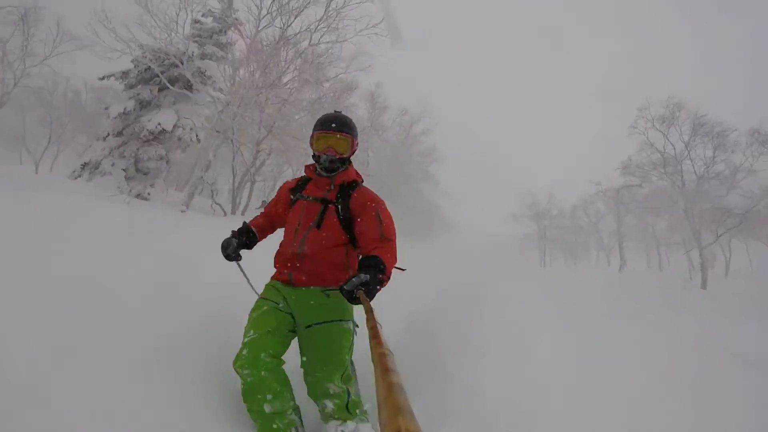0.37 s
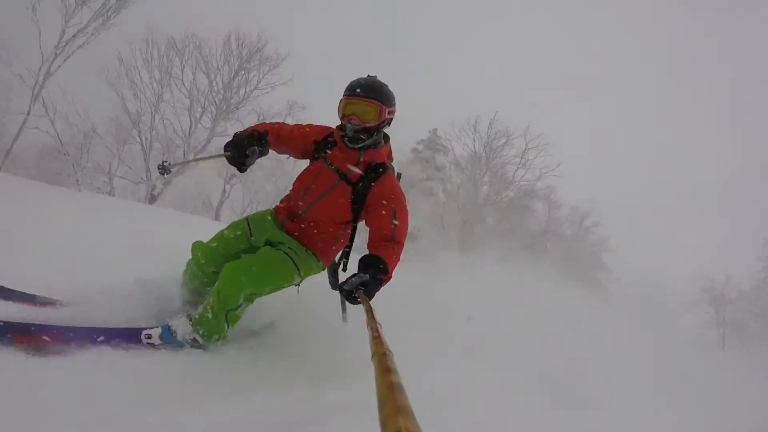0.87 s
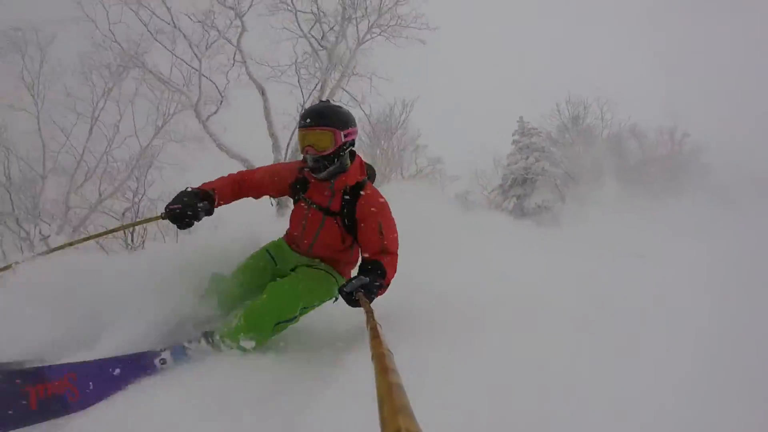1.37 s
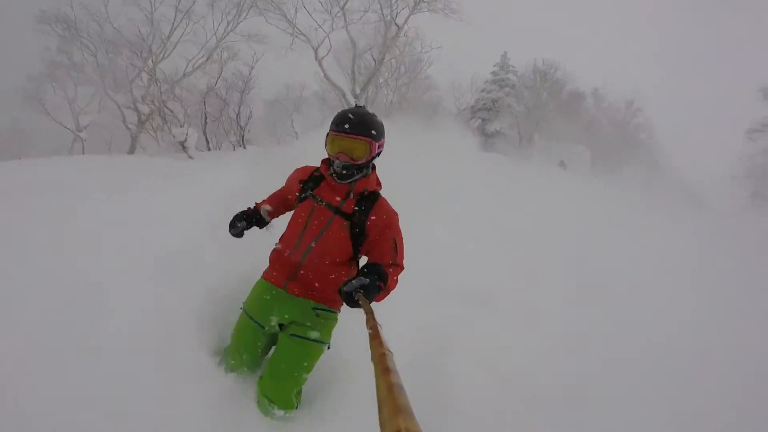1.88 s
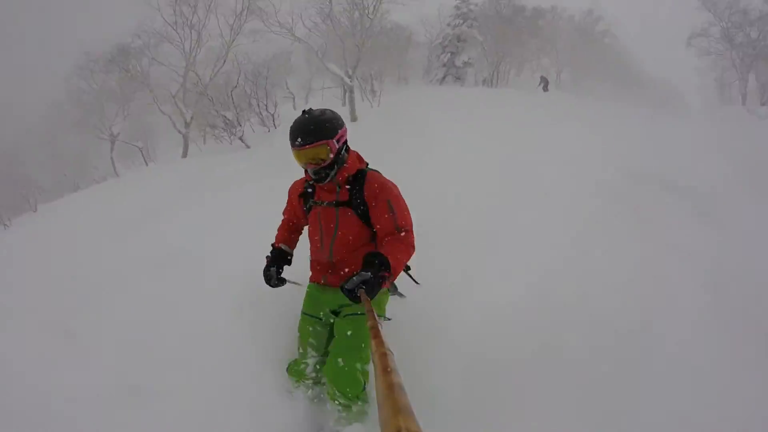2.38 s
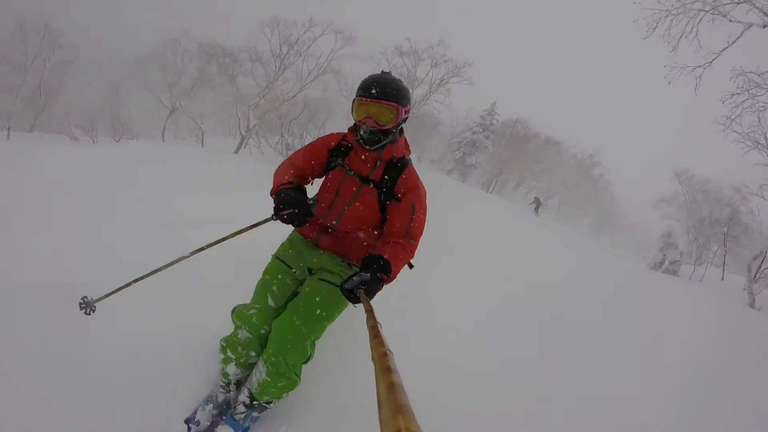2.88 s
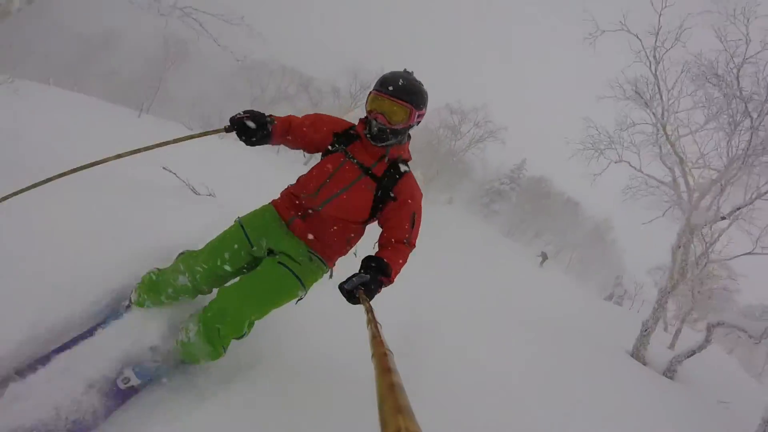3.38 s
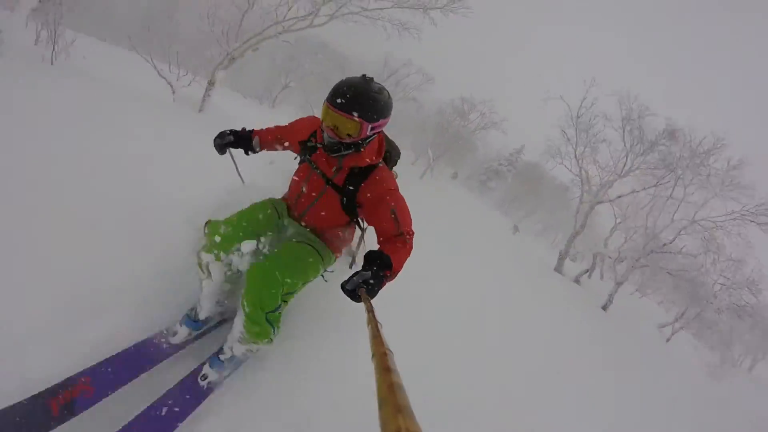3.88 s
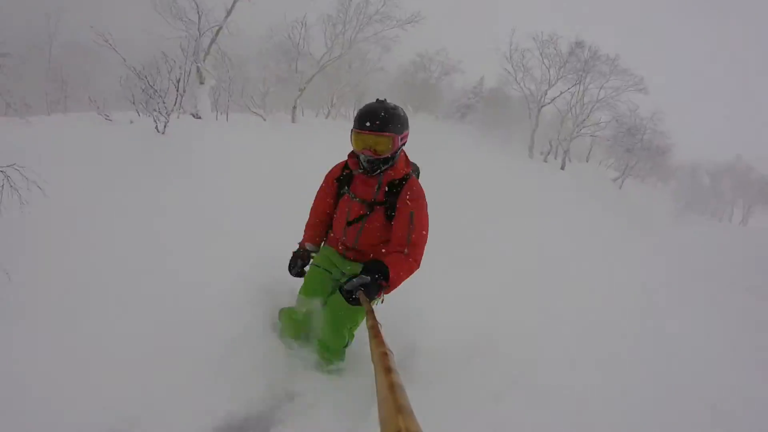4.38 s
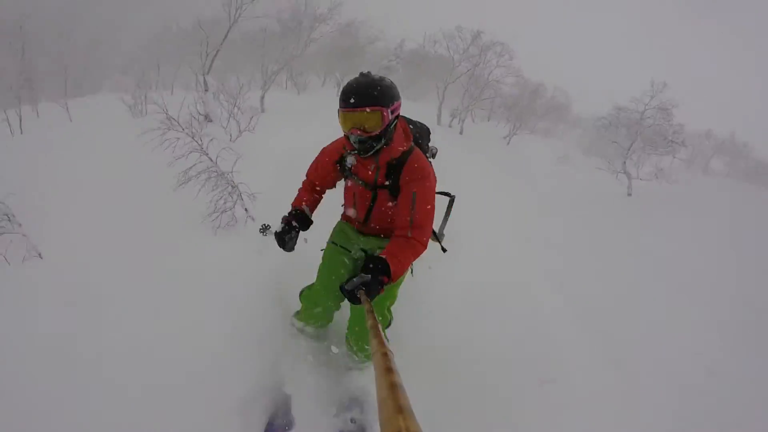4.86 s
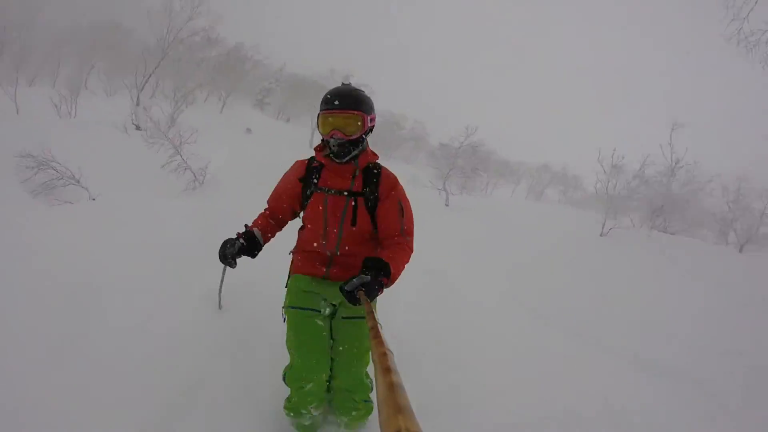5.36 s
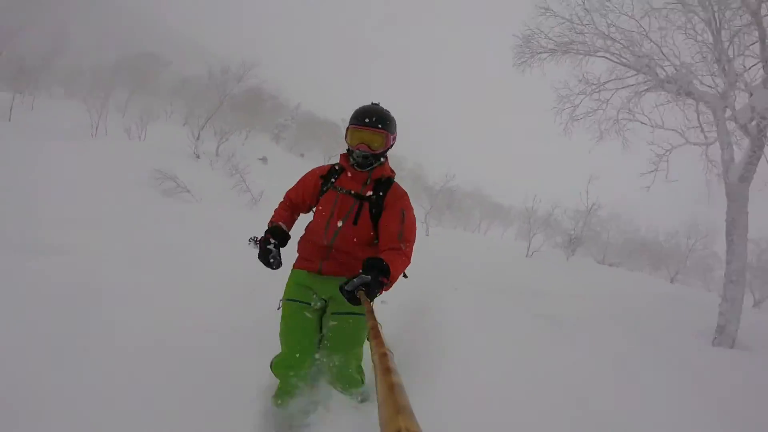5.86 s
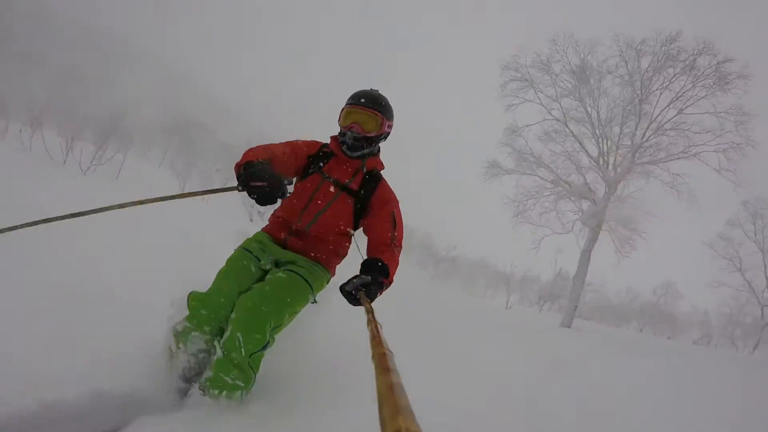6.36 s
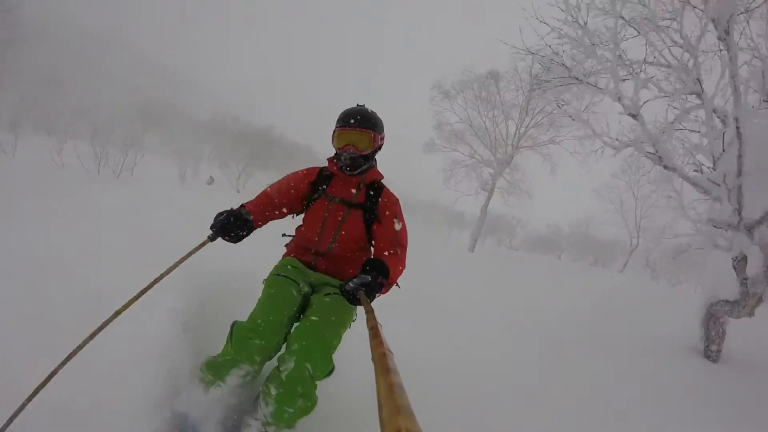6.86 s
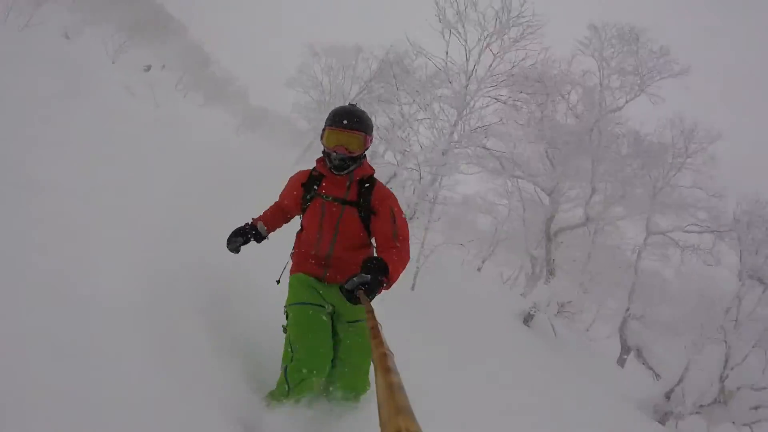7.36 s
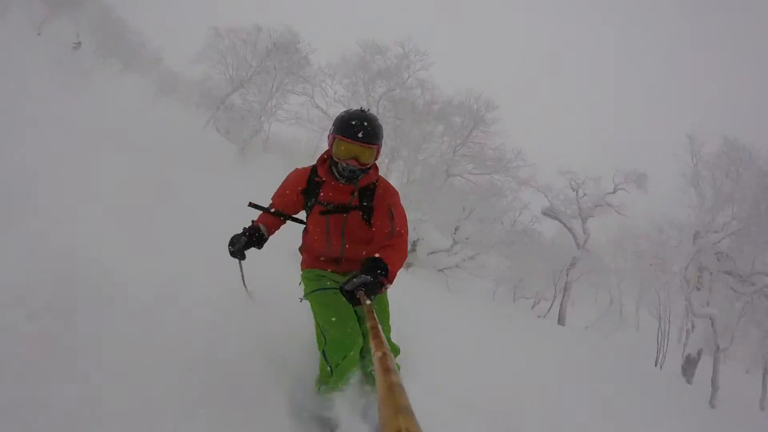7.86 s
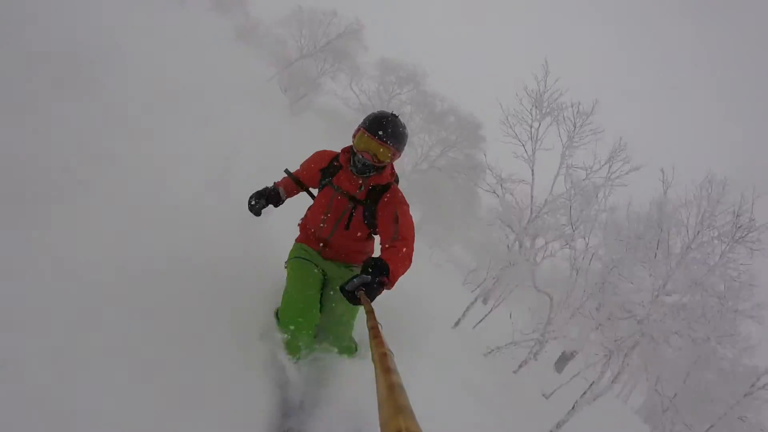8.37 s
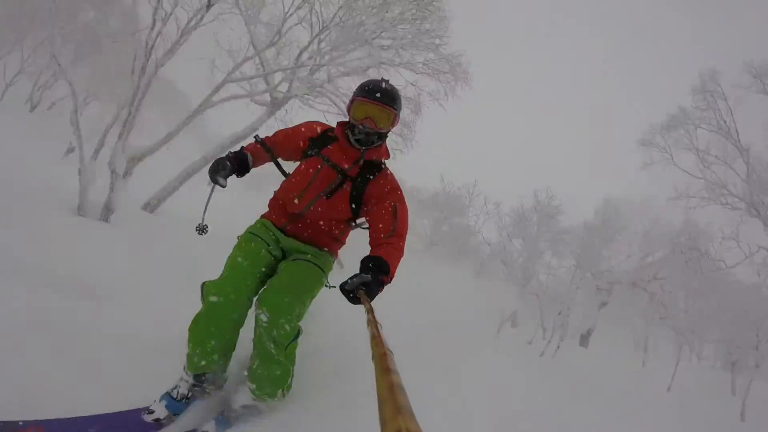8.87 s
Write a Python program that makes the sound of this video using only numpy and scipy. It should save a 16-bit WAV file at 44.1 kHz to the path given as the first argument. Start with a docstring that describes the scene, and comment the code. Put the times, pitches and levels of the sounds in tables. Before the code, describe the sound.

A small plastic-cased camera rides on a pole down a snowy slope. Snow grains patter on the shell as sharp dry ticks over a fine, thin hiss of powder and skis. Deep wind lumps and a wavering low moan swell in the first two seconds and again just after four, then ease; the ticking grows denser and harder toward the end.

```python
"""A ski slope in falling snow: a small camera in a plastic housing rides down it on a pole.
Shaped noise makes the wind that buffets the housing; a wobbling band of noise moans around the pole.
Snow grains tick on the plastic, each a push and a few dying modes; a few low thuds are pushes too.
Behind them, flickering treble noise is the fine hiss of powder and of the skis."""
import sys
import numpy as np
from scipy import signal
from scipy.io import wavfile
from scipy.ndimage import uniform_filter1d

SR = 44100
rng = np.random.default_rng(int(sys.argv[2]) if len(sys.argv) > 2 else 0)


def int16_out(signal):
    """Quantize to a 16-bit WAV file."""
    q = np.round(np.clip(np.atleast_2d(signal).T, -1, 1) * 32767)
    wavfile.write(sys.argv[1], SR, q.astype(np.int16))


def convert_level_to_amplitude(level_db):
    """Map a level in decibels to its linear amplitude factor."""
    exponent = np.asarray(level_db, float) / 20
    return 10 ** exponent


N = 396459  # samples

# Share of the upper shell mode, by chance of the spot struck; ticks() limits it
UPPER_DB, UPPER_SPREAD_DB = -8, 12


def buffeting(t):
    """Slow pressure lumps of eddies that roll over the housing, and the roar of the smaller ones."""
    # Course of the wind at the housing: t/s, buffeting level/dB, roar level/dB
    wind = [(0.0, -32, -51.5), (0.8, -31, -46), (1.52, -19.5, -46.5), (2.45, -32.5, -50), (3.9, -30, -51.5),
            (3.98, -27.5, -38), (4.06, -21, -49), (4.33, -17.5, -38), (4.46, -14.5, -45.5),
            (4.78, -30, -49.5), (6.28, -34.5, -49), (6.91, -27.5, -46), (7.36, -40, -47), (7.8, -25, -46),
            (8.3, -28, -40), (8.56, -28.5, -35), (8.84, -23, -46.5), (8.99, -35, -41)]
    # Spectrum of the slow lumps, before levelling: f/Hz, level/dB
    lump_spectrum = [(4, 1.5), (10, 3.5), (28, -1), (50, -17), (90, -18.5), (160, -62), (400, -119)]
    # Spectrum of the roar, before levelling: f/Hz, level/dB
    roar_spectrum = [(40, -38), (70, 11), (190, -4.5), (300, -13.5), (600, -19), (1200, -20), (3000, -87)]
    level_db, roar_db = curve(wind, t)
    lumps = convert_level_to_amplitude(level_db) * noise(lump_spectrum, size=4096, patchy_db=0.4, flicker_db=0.4)
    roar = convert_level_to_amplitude(roar_db) * noise(roar_spectrum, size=1024, patchy_db=0.5, flicker_db=4.0)
    return lumps + roar


def moan(t):
    """Vortices shed unsteadily from the pole: a band of noise that rides on the air speed."""
    # Course of the moan: t/s, level/dB, centre f/Hz
    course = [(0.0, -51, 75.35), (0.57, -42.5, 75.2), (0.7, -24, 88.4), (0.8, -23.5, 91),
              (1.08, -17, 108.9), (1.22, -24.5, 99.1), (1.45, -20.5, 127.9), (1.6, -22.5, 97.2),
              (1.88, -32.5, 84.7), (2.05, -26, 76.4), (2.3, -46, 70.3), (2.6, -31.5, 64.5), (2.85, -51, 69),
              (3.0, -34.5, 65.5), (3.5, -32, 73), (3.9, -32.5, 79), (4.02, -18.5, 88), (4.2, -29.5, 80.2),
              (4.7, -52.5, 69.2), (6.3, -45, 60), (6.45, -34, 60.56), (6.6, -29.5, 69), (6.8, -46, 56),
              (7.5, -43, 60), (7.93, -28.5, 73.7), (8.1, -42.5, 69), (8.99, -40.5, 68.2)]
    level_db, hz = curve(course, t)
    width_hz, skirt_db = 21, -8  # width of each smoothing stage; skirt against core
    r = np.exp(-np.pi * width_hz / SR)
    wobble = rng.standard_normal(N) + 1j * rng.standard_normal(N)
    stages = []
    for _ in range(3):
        wobble = signal.lfilter([1 - r], [1, -r], wobble)
        stages.append(wobble / np.std(wobble))
    core, skirt = stages[2], stages[1]  # the skirt is wider and more ragged
    wobble = core + convert_level_to_amplitude(skirt_db) * skirt
    carrier = np.exp(2j * np.pi * np.cumsum(hz) / SR)
    return convert_level_to_amplitude(level_db) * evened((wobble * carrier).real)


def large_grains():
    """Single grains heavy enough to be heard one by one."""
    # Grains on the plastic: t/s, shell ring peak level/dB, bright ring level/dB against that peak
    grains = [(0.1292, -24, 1), (0.1454, -19.5, -5), (0.1945, -19, -6), (0.2073, -19, -13),
              (0.2726, -15, -3.5), (0.2775, -24, 2.5), (0.4088, -24, -4), (0.491, -18.5, -11),
              (0.6248, -20.5, -6.5), (0.651, -23.5, -3.5), (0.7192, -24.5, -14), (0.9585, -24.5, -22),
              (1.1117, -27, -4), (1.182, -26.5, -10), (1.3237, -24, -11), (1.54, -25.5, -15),
              (1.618, -26, -16), (1.66, -19.5, -5), (1.7196, -22.5, -7), (1.8033, -19, -10),
              (1.8711, -16.5, -7), (1.8921, -25, -4), (1.991, -13.5, -12), (2.1246, -20, -29),
              (2.17, -19.5, -6), (2.183, -24, -12), (2.191, -20, -11), (2.232, -21.5, -7),
              (2.2564, -15.5, -6), (2.3296, -18.5, -17), (2.3934, -21.5, -15), (2.467, -24, -6),
              (2.49, -23, -5), (2.5326, -28, -25), (2.5474, -24, -25), (2.5612, -21, -20),
              (2.575, -21, -16), (2.589, -23.5, -21), (2.6935, -23, -18), (2.7027, -15.5, -14),
              (2.7114, -25.5, -25), (2.8672, -27, -4), (2.9329, -21.5, -17), (2.977, -31, -7),
              (2.9966, -26, -9), (3.0134, -26, -7), (3.0497, -25.5, -7), (3.1108, -22, -4),
              (3.1639, -18, -3), (3.2554, -23.5, -22), (3.2842, -34, -3), (3.31, -28.5, -11),
              (3.381, -27, -9), (3.425, -38, 7), (3.509, -22, -5), (3.585, -21.5, -11), (3.7216, -24.5, -9),
              (3.7806, -32, -9), (3.8691, -27, -4), (3.991, -24, -10), (4.061, -24.5, -8.5),
              (4.1386, -16.5, -12.5), (4.1973, -28.5, -6), (4.2524, -17.5, -8), (4.263, -17.5, -2.5),
              (4.3066, -21.5, 0), (4.318, -21, 0), (4.3492, -27, -8), (4.3686, -21, -20),
              (4.481, -30.5, -12), (4.528, -15.5, -13), (4.6, -24.5, -4.5), (4.685, -27.5, 2),
              (4.7105, -27.5, -8), (4.81, -26, -3), (4.8521, -25, -7), (5.027, -27, -8), (5.0766, -28, -6),
              (5.0938, -22, -12), (5.1863, -24, -9), (5.445, -21, -7), (5.48, -19.5, -7),
              (5.5132, -21.5, -5.5), (5.5365, -16.5, -14), (5.6389, -20.5, -26), (5.693, -35.5, 5.5),
              (5.7219, -37, -2), (5.7396, -24, -8), (5.781, -24, -17), (5.793, -17, -5.5),
              (5.825, -22.5, -10), (5.8652, -21.5, -4), (6.039, -25, -5), (6.044, -23, -4),
              (6.0719, -26, -2), (6.092, -26, -5), (6.167, -15, -8.5), (6.195, -25.5, -19),
              (6.2537, -15.5, -9), (6.331, -20.5, -9), (6.4134, -20.5, -8), (6.482, -24, -9),
              (6.5708, -24, -16), (6.588, -23, -22), (6.6231, -19, -6.5), (6.7385, -21, -4),
              (6.7512, -17.5, -6), (6.8282, -23.5, -2), (6.893, -15.5, -20), (6.9471, -24, -10),
              (6.962, -21.5, -12), (7.008, -15.5, -5.5), (7.024, -19.5, -5), (7.2094, -35, -2),
              (7.2214, -22, -1), (7.243, -24, -13), (7.2587, -19.5, -16), (7.2723, -15, -14),
              (7.3236, -17, -22), (7.3851, -22, -12), (7.42, -15, -20), (7.434, -23, -16),
              (7.4604, -25.5, -10), (7.4832, -20.5, -9), (7.5057, -15.5, -3.5), (7.5478, -17, -5.5),
              (7.5653, -21.5, -14), (7.6813, -18, -11), (7.7047, -17.5, -6), (7.7329, -21.5, -2.5),
              (7.745, -12, -13), (7.756, -20, -12), (7.7677, -21.5, 0), (7.807, -24, -10),
              (7.9986, -16.5, -4.5), (8.026, -18.5, -0.5), (8.0434, -19, -19), (8.092, -14, -12),
              (8.16, -17.5, -3.5), (8.221, -18.5, -4), (8.3507, -18.5, -6), (8.378, -17.5, -5),
              (8.385, -18, -4), (8.411, -19, -3), (8.4953, -30, 6), (8.5232, -19, -12), (8.6, -39.5, 1),
              (8.6627, -20.5, 3), (8.6886, -19, 1), (8.716, -20, -4), (8.739, -17.5, -4.5),
              (8.8807, -17.5, -9), (8.9029, -15.5, -4.5), (8.9093, -10.5, -10), (8.934, -28.5, 4),
              (8.961, -27.5, 4)]
    s, peak_db, bright_db = np.transpose(grains)
    upper_db = UPPER_DB + UPPER_SPREAD_DB * rng.random(len(s))
    return ticks(np.transpose([s, peak_db, upper_db, bright_db]))


def small_grains(t, stream_db, count, top_db, spread_db, crowding):
    """Random fine grains that come thicker and harder when the stream is strong; none grows large."""
    s, size, a, b = rng.random((count, 4)).T
    arrived = np.cumsum(convert_level_to_amplitude(crowding * stream_db))
    s = np.interp(s, arrived / arrived[-1], t)
    size_db = spread_db * np.log(size ** 1.34 * 0.74 + 0.047)
    peak_db = 0.6 * np.interp(s, t, stream_db) + top_db + size_db
    upper_db = UPPER_DB + UPPER_SPREAD_DB * a
    bright_db = -11 + 13 * b
    return ticks(np.transpose([s, peak_db, upper_db, bright_db]))


def ticks(rows):
    """The blow rings the shell modes; the grain's crumbs rattle the bright ones for a moment longer."""
    # Two shell modes of the housing, nominal: f/Hz, level/dB, 60 dB decay/s
    shell_modes = [(1918, 0.5, 0.0079), (2573, -1.5, 0.0088)]
    # Bright modes of the housing, nominal: f/Hz, level/dB, 60 dB decay/s
    bright_modes = [(3634, 4, 0.0079), (4430, 13, 0.003), (5640, 6, 0.0067), (7370, -1.5, 0.0062),
                    (10850, -19, 0.0099), (13500, -27, 0.0055)]
    peak_db, upper_db, bright_db = (c[:, None] for c in np.transpose(rows)[1:])
    draws = rng.standard_normal((len(rows), 240))
    chance, crumbs = np.clip(draws[:, :40], -1.6, 1.6), draws[:, 40:]
    t = np.arange(600) / SR

    upper = np.clip(convert_level_to_amplitude(upper_db), 0.3, 0.8)
    shell = rings(shell_modes, [np.sqrt(1 - upper ** 2), upper], t, chance)
    rise_s = 0.00021 * convert_level_to_amplitude(1.8 * chance[:, [6]])  # the blow's rise time varies by chance
    shell *= 1 - np.exp(-(t / rise_s) ** 2)
    shell /= abs(shell).max(axis=1, keepdims=True)

    crumb_decay_s = 0.00055 * convert_level_to_amplitude(4.5 * chance[:, [7]])
    crumbs = crumbs * np.exp(-t[:200] / crumb_decay_s)
    # Hard grains reach the top modes, soft ones do not
    hardness_db = 4.5 * chance[:, [32]]  # per octave from 4500 Hz
    octaves = np.log2(np.transpose(bright_modes)[0] / 4500)[:, None, None]
    bright = rings(bright_modes, convert_level_to_amplitude(octaves * hardness_db), t, chance[:, 16:])
    bright = signal.fftconvolve(bright, crumbs, axes=1)[:, :len(t)]
    bright *= 1 - np.exp(-(t / 0.0001) ** 2)
    bright /= abs(bright).max(axis=1, keepdims=True)

    thud = convert_level_to_amplitude(3.0 * chance[:, [5]]) * push(t, width_s=0.00021)
    tick = thud - shell + convert_level_to_amplitude(bright_db) * bright
    return place(np.transpose(rows)[0], convert_level_to_amplitude(peak_db) * tick)


def rings(modes, shares, t, chance):
    """Dying modes; each grain strikes another spot, so pitch and decay shift a little."""
    total = 0
    for k, (share, (hz, db, t60)) in enumerate(zip(shares, modes)):
        struck_t60 = t60 * convert_level_to_amplitude(np.minimum(4.0 * chance[:, [8 + k]], 1))
        struck_hz = hz * (1 + 0.062 * chance[:, [k]])
        total = total + share * convert_level_to_amplitude(db - 60 * t / struck_t60) * np.sin(2 * np.pi * struck_hz * t)
    return total


def push(t, width_s):
    """The shell is pushed in and springs back."""
    return (t / width_s - 1.2) * np.exp(-t / width_s) * (1 - np.exp(-(2 * t / width_s) ** 2))


def low_thuds(t):
    """Low thuds on the housing, each a push of the shell; two of them lie under ringing ticks."""
    # Low thuds: t/s, level of the push/dB, contact time/s
    thuds = [(3.97, -35, 0.0012), (6.5849, -3.5, 0.00025), (7.025, -12.5, 0.00055)]
    s, db, contact_s = np.transpose(thuds)[:, :, None]
    return place(s[:, 0], convert_level_to_amplitude(db) * push(t[:1500], contact_s))


def stream(t):
    """Strength of the snow stream in dB: its slow course, broken into uneven flurries."""
    # Slow course of the snow stream, with a brief lull near the end: t/s, level/dB
    course = [(0.0, -55), (0.15, -48), (0.45, -50), (0.8, -53), (1.4, -52), (1.75, -49), (2.28, -48),
              (2.44, -56), (2.57, -46), (2.85, -54), (3.35, -51), (3.55, -55), (3.9, -52), (4.2, -55),
              (4.33, -46), (4.5, -55), (5.3, -53.5), (5.45, -50.5), (5.62, -50), (5.68, -61), (5.9, -55),
              (6.1, -51), (7.05, -48), (7.25, -45), (7.75, -44), (8.3, -47), (8.42, -42), (8.76, -43),
              (8.78, -59.5), (8.87, -58), (8.89, -45), (8.99, -46)]
    knots = np.arange(0, t[-1] + 1, 1 / 22)  # s; a new random strength at each
    flurry_db = 2.2 * np.interp(t, knots, rng.standard_normal(400)[:len(knots)])
    return curve(course, t)[0] + flurry_db


def powder_hiss(t, stream_db):
    """Finest snow on the housing hisses with the stream; under it lies the steadier hiss of the skis."""
    # Spectrum of both hisses, before tilt and levelling: f/Hz, level/dB
    hiss_spectrum = [(150, -6), (400, -5), (1300, -5.5), (2180, -2.5), (2650, 0.5), (3540, -5.5),
                     (5800, -11), (11000, -22.5), (14500, -42), (16500, -79)]
    # Ski hiss, louder in the turns: t/s, level/dB
    skis = [(0.0, -53), (0.6, -51.5), (1.0, -52.5), (1.6, -52.5), (2.3, -63.5), (3.0, -62), (3.6, -53),
            (4.2, -56.5), (5.0, -60.5), (5.7, -62), (6.5, -57), (7.5, -59), (8.6, -49), (8.8, -59.5),
            (8.99, -48)]
    tilt_db = 0.25 * (stream_db - stream_db.mean())  # the treble rises and falls with the stream level
    dust = noise(hiss_spectrum, size=256, patchy_db=5.0, flicker_db=8.5, tilt_db=tilt_db)
    ski_hiss = noise(hiss_spectrum, size=512, patchy_db=2.5, flicker_db=2.8, tilt_db=tilt_db)
    return convert_level_to_amplitude(stream_db - 7) * dust + convert_level_to_amplitude(curve(skis, t)[0]) * ski_hiss


def noise(spectrum, size, patchy_db, flicker_db, tilt_db=np.zeros(N)):
    """Random short-time spectra with drifting patches and a shared flicker, scaled to rms 1.
    The tilt (dB per octave above 2500 Hz) turns the treble."""
    hop = size // 4
    frames, hz = N // hop + 5, np.fft.rfftfreq(size, 1 / SR)
    a, b, patches = rng.standard_normal((frames, len(hz), 3)).T
    patches = uniform_filter1d(patches, size=4, axis=0)  # over frequency
    patches = evened(uniform_filter1d(patches, size=6, axis=1))  # over time
    flicker = evened(uniform_filter1d(rng.standard_normal(frames), size=3))
    f, db = np.transpose(spectrum)
    field_db = np.interp(np.log(hz + 1), np.log(f + 1), db)[:, None]
    field_db = field_db + patchy_db * patches + flicker_db * flicker
    frame_tilt_db = tilt_db[np.minimum(np.arange(frames) * hop, N - 1)]
    field_db = field_db + np.log2(np.maximum(hz / 2500, 1))[:, None] * frame_tilt_db
    _, x = signal.istft((a + 1j * b) * convert_level_to_amplitude(field_db), nperseg=size, noverlap=size - hop)
    return evened(x[:N])


def evened(x):
    """Scales to rms 1."""
    return x / np.sqrt(np.mean(x ** 2) + 1e-20)


def curve(rows, t):
    """Reads each column of a table at times t."""
    s, *columns = np.transpose(rows)
    return [np.interp(t, s, c) for c in columns]


def place(s, sounds):
    """Lays short sounds on the timeline."""
    at = np.round(np.asarray(s) * SR).astype(int)[:, None] + np.arange(sounds.shape[1])
    return np.bincount(at.ravel(), sounds.ravel(), N + sounds.shape[1])[:N]


def scene():
    """Wind, grains, low thuds and powder hiss, all at the one microphone."""
    t = np.arange(N) / SR
    wind = buffeting(t) + moan(t)
    stream_db = stream(t)
    hiss = powder_hiss(t, stream_db)
    fine = small_grains(t, stream_db, count=1900, top_db=3.5, spread_db=12, crowding=0.73)
    return (wind + large_grains() + fine + low_thuds(t) + hiss)[None]


def roll_off(x):
    """The treble ends steeply here."""
    return signal.sosfilt(signal.butter(12, 16430, fs=SR, output="sos"), x)


def record(dry):
    """The microphone path rounds the largest swings and rolls off the top treble."""
    rounded = np.tanh(1.1 * dry) / 1.1
    rolled = signal.sosfilt(signal.butter(8, 14300, fs=SR, output="sos"), rounded)
    return roll_off(rolled)


dry = scene()
out = record(dry)
int16_out(out)
```